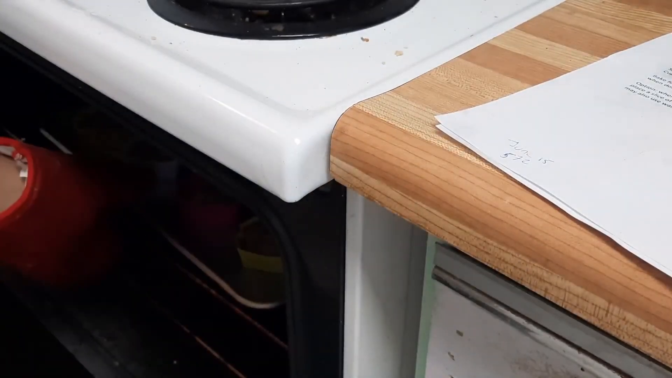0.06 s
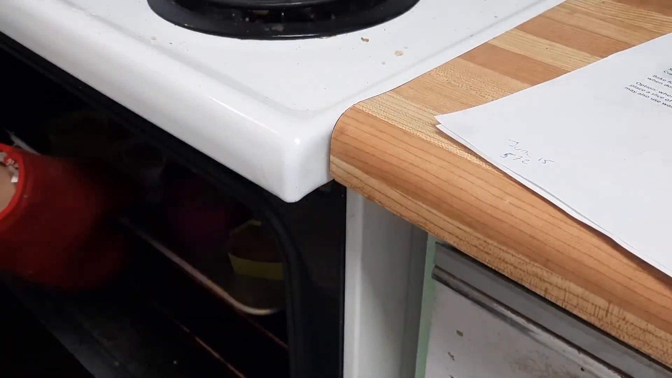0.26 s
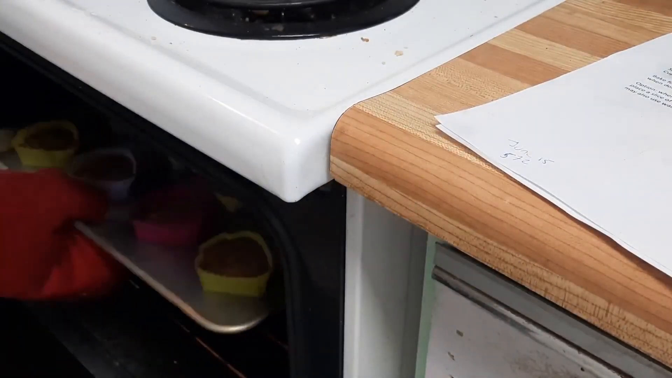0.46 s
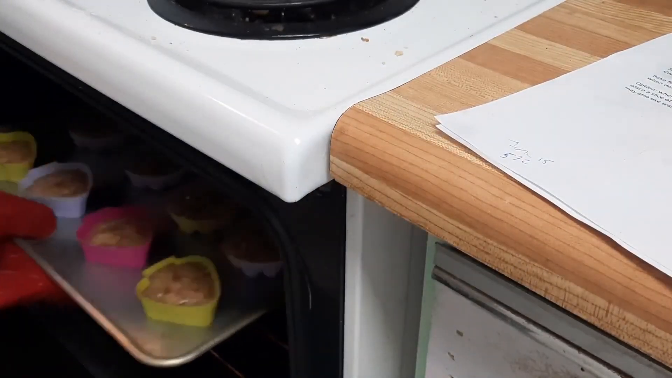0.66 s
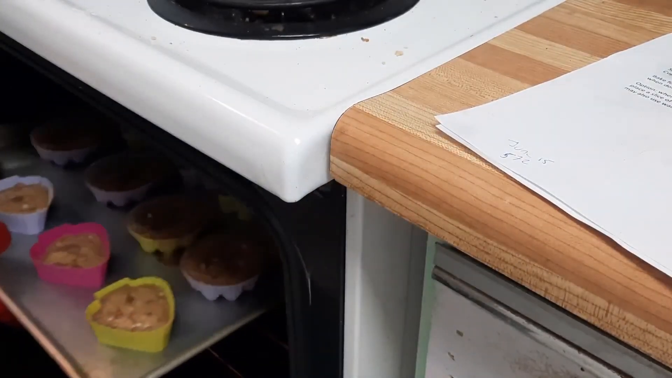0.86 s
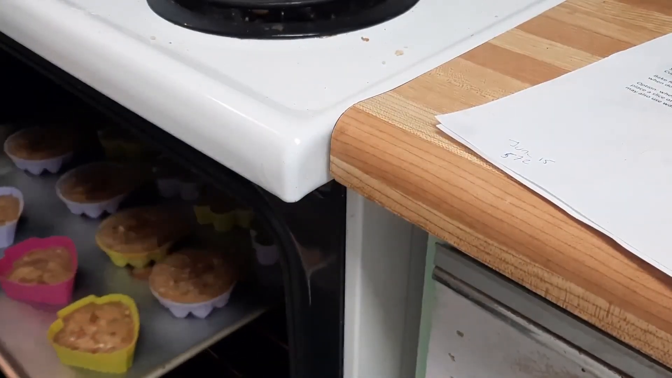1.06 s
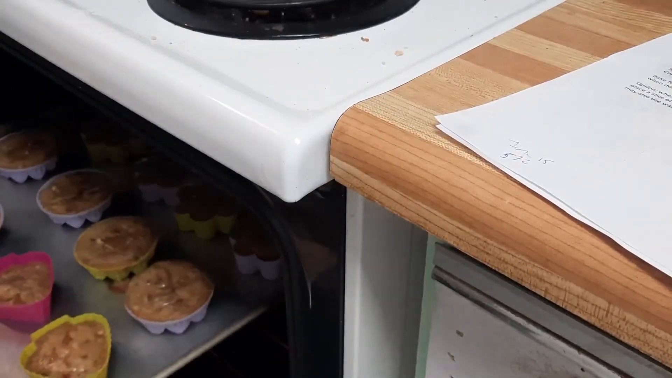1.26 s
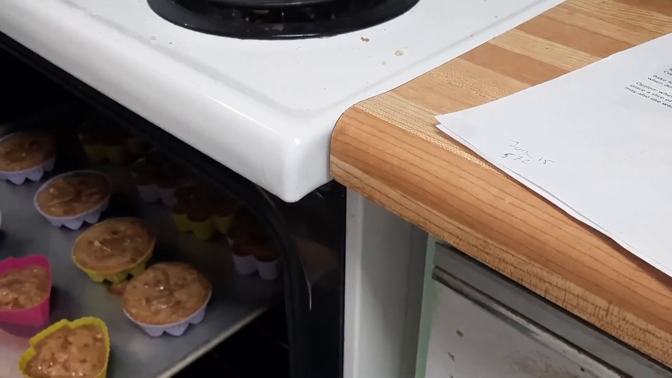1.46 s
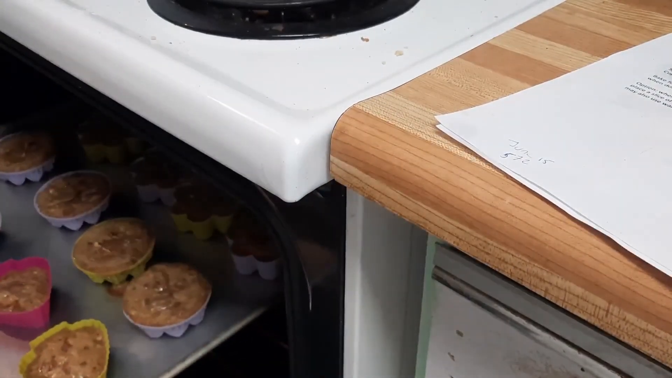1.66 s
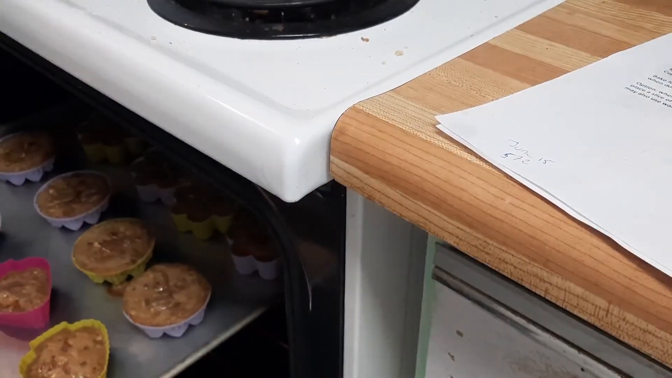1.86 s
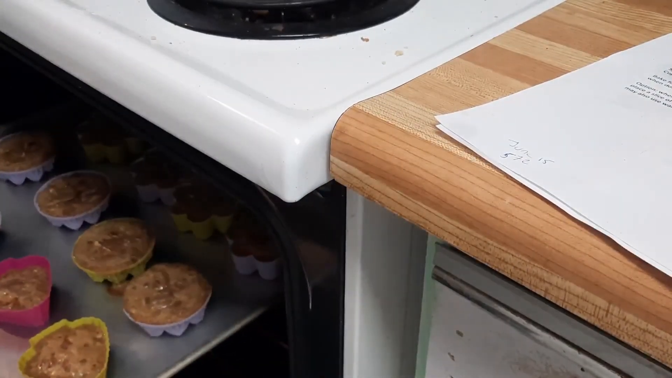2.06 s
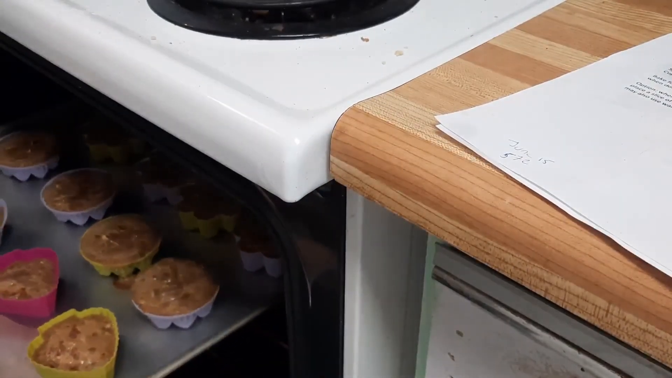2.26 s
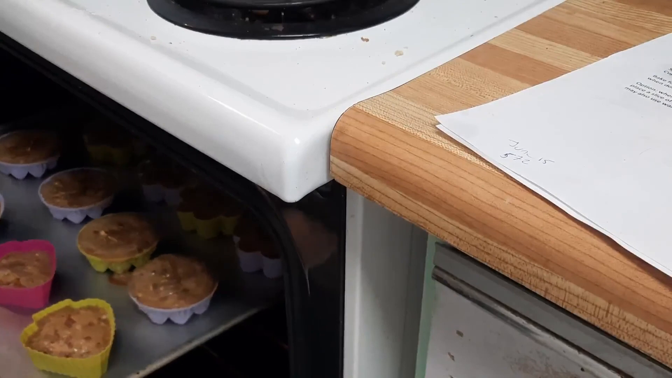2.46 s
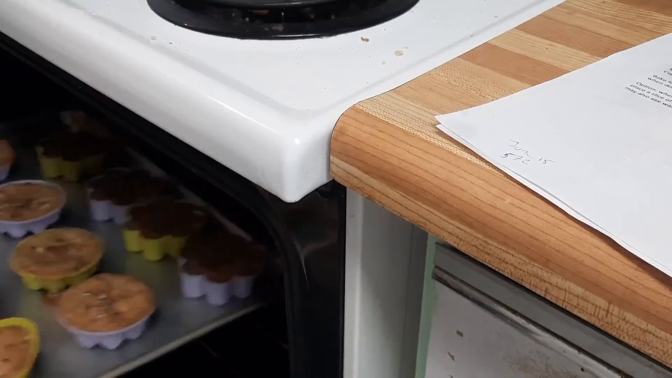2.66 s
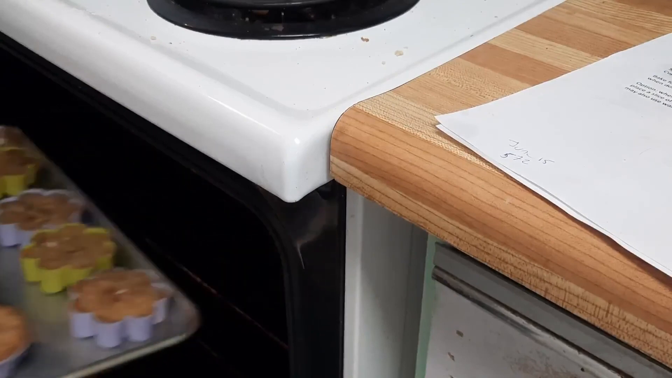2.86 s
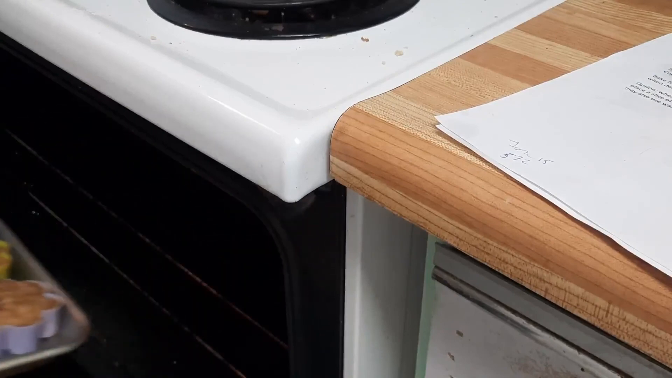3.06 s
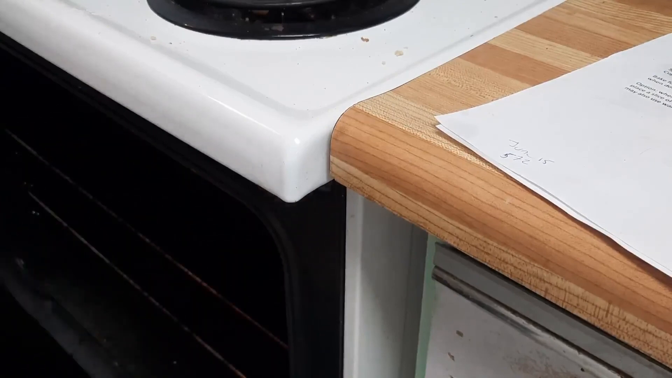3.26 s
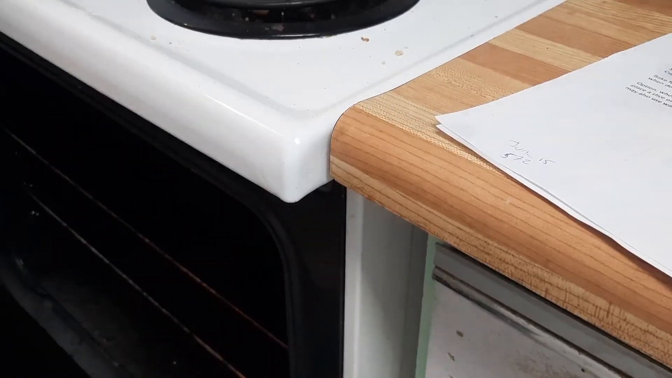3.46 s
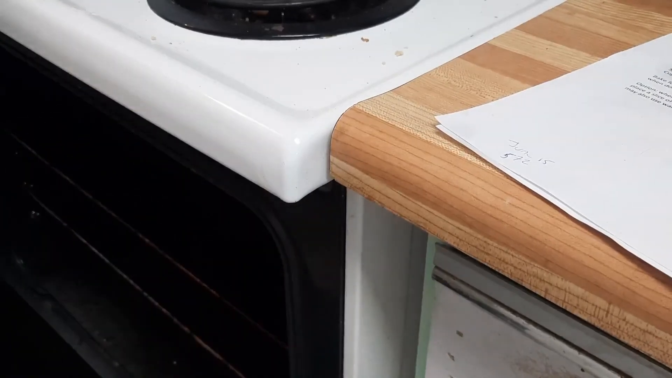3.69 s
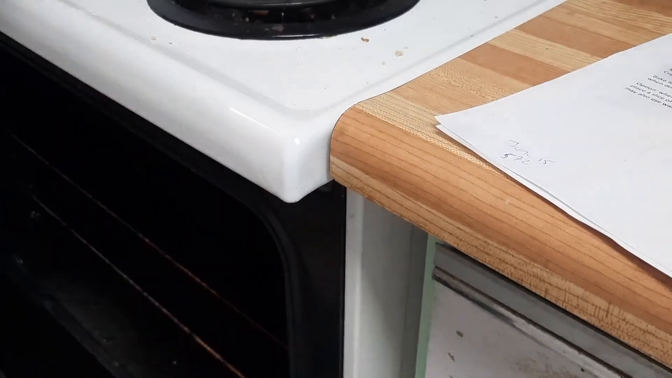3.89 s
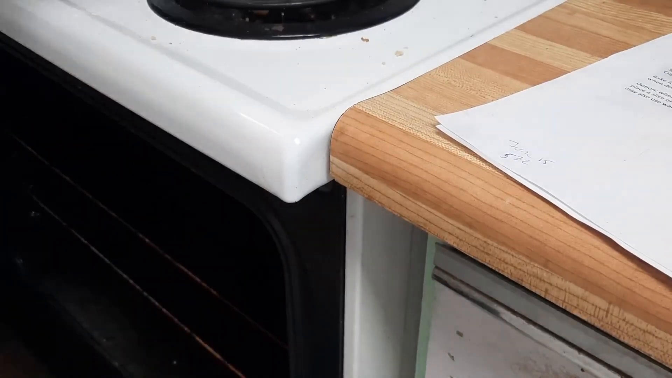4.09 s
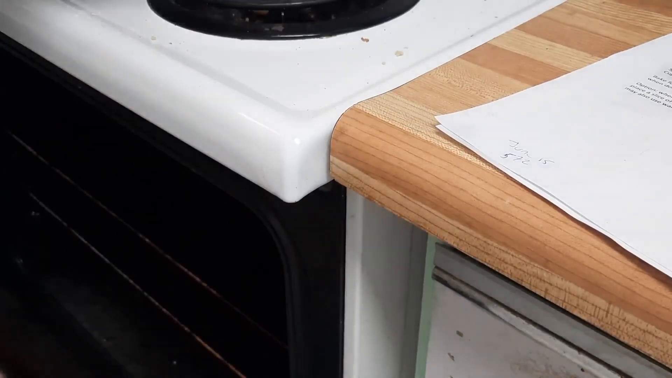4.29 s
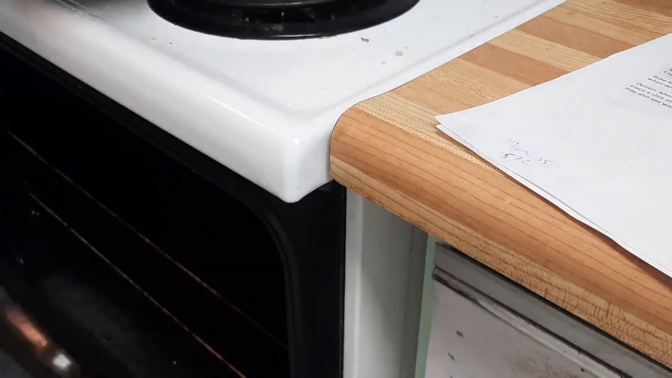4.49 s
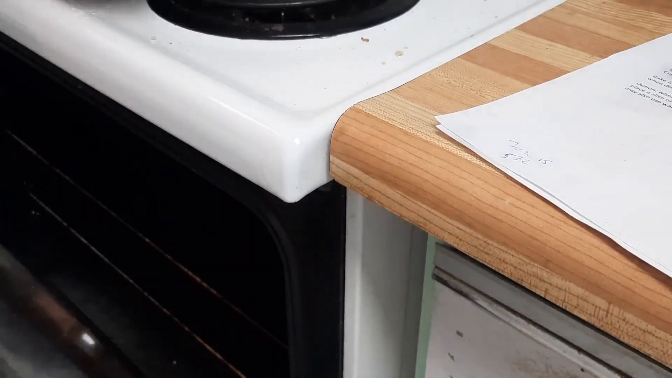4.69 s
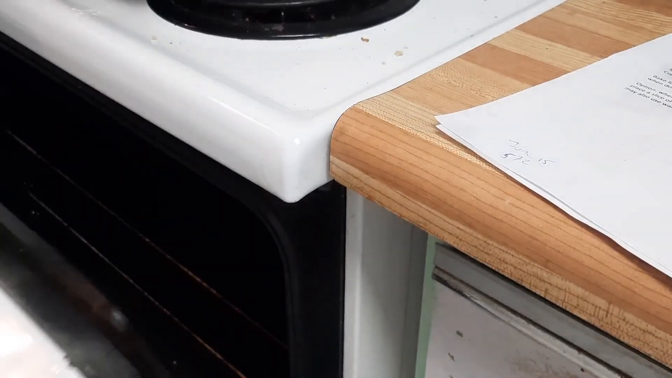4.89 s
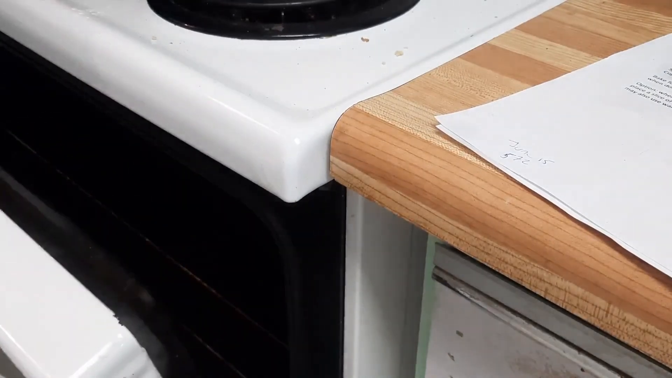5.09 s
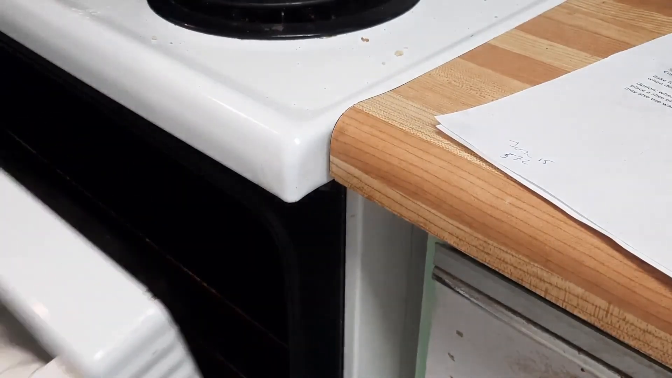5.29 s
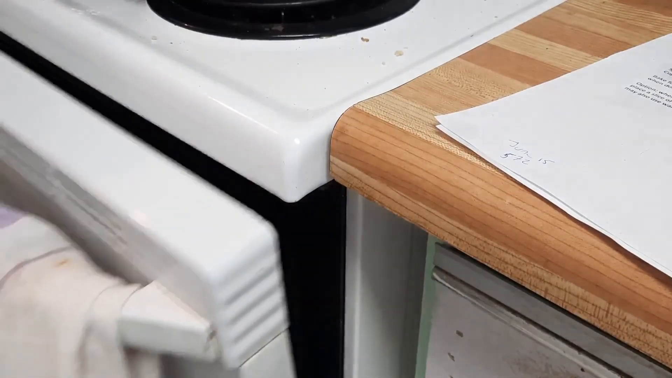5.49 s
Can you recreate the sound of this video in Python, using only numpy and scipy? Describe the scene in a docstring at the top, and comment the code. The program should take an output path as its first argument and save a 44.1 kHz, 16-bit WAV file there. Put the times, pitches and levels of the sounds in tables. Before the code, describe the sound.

In a small kitchen with a low pulsing fridge hum, a loaded steel rack gets several quick knocks and is dragged out with a fading ringing scrape. After a quiet pause the baking tray slides off with a short scrape and softer knocks. Faint cloth rustles follow, then hard, rattling clunks of rack and oven door. Close stereo microphone, a little louder on the left, with a short metallic echo.

```python
"""Rack and tray out of the oven

A wire rack with a baking tray is dragged out of an open oven; the tray rests, slides off and is set down.
Then rack and steel door clunk and rattle. A fridge hums in the small kitchen. Steel is shaped noise through
resonant modes, cloth is lumpy noise, the hum is two beating tones, and sparse decaying taps give the echo.
"""
import sys
import numpy as np
from scipy import signal
from scipy.fft import rfft, irfft, next_fast_len
from scipy.io import wavfile
from scipy.ndimage import uniform_filter1d

SR = 44100
rng = np.random.default_rng(int(sys.argv[2]) if len(sys.argv) > 2 else 0)


def persist_wave(psi):
    """Save psi, clipped to +-1, as 16-bit WAV."""
    counts = np.round(np.clip(psi, -1, 1) * 32767).astype(np.int16)
    wavfile.write(sys.argv[1], SR, np.atleast_2d(counts).T)


N = 244314
SIZE = next_fast_len(N)
TIME, HZ = np.arange(N) / SR, np.fft.rfftfreq(SIZE, 1 / SR)

# Room tone spectrum. Each row: frequency in Hz, relative level in dB.
AIR_COLOUR = [(30, -23), (54, -7.5), (81, -22), (120, -15), (160, -9.5), (300, -7.5), (438, -17),
              (521, -18.5), (900, -28.5), (1300, -40.5), (1700, -64)]
# Room resonances. Each row: centre in Hz, width of each of two passes in Hz, rms level in dB.
AIR_PEAKS = [(61, 19, -66), (200.9, 46, -58), (265, 87, -72), (305.2, 38, -55), (519.4, 31, -74),
             (681, 30, -74.5), (848, 15, -77.5)]
# Microphone hiss spectrum. Each row: frequency in Hz, relative level in dB.
HISS_COLOUR = [(530, -31), (900, -10), (1200, -21), (1780, -18.5), (2130, -20.5), (2620, -26), (5900, -27),
               (13800, -22.5), (16300, -30)]
AIR_DB, HISS_DB = -57, -74
# Left-right likeness. Each row: frequency in Hz, likeness from 0 to 1.
LIKENESS = [(60, 0.9), (250, 1), (500, 0.77), (900, 0.91), (1500, 0.056), (16000, 0.038)]
# Kitchen echo decay. Each row: frequency in Hz, t60 in seconds.
KITCHEN_DECAY = [(100, 0.25), (1000, 0.82), (5000, 0.2), (15000, 0.44)]
# Fabric friction spectrum. Each row: frequency in Hz, relative level in dB.
CLOTH_COLOUR = [(700, -34.5), (1300, 13.5), (2500, 1), (5000, -6.0), (9000, -5.0), (16000, -12.0)]
# Faint rustles of glove and sleeve. Each row: start in seconds, length in seconds, hiss in dB, scrape in dB.
RUSTLES = [(0, 0.076, -75, -60), (0.064, 0.13, -68, -66.5), (1.757, 0.12, -78.5, -81),
           (2.2, .19, -69.5, -77.5), (3.283, 0.19, -77, -90), (3.698, 0.22, -80, -74.5),
           (3.827, 0.25, -76, -75), (4.095, 0.17, -80.5, -78), (4.263, 0.16, -84, -76),
           (5.12, 0.11, -64, -67), (5.304, .24, -65, -63)]
# Faint rings, short tonal knocks and squeaks of wire and tray. Each row: start in seconds, pitch in Hz,
# level in dB before swell and decay, t60 in seconds.
FAINT_TONES = [(0.041, 812, -50.5, .38), (1.22, 873, -59, 2), (1.755, 8600, -70.5, 0.38),
               (2.3, 2470, -71, 0.46), (2.65, 390, -39.5, 0.3), (2.79, 645, -39, 0.36),
               (2.98, 798, -41.5, 0.38), (3.1, 1690, -61, 1.1), (3.25, 860, -61, 1.0),
               (3.1, 2760, -60, 0.9)]
# Decay of struck sheet steel. Each row: frequency in Hz, t60 in seconds at ring factor 1.
STEEL_DECAY = [(80, 0.81), (260, 0.45), (700, 0.16), (1840, 0.23), (4850, 0.23), (12800, 0.15)]
# Centres in Hz of the bands in which a blow decays.
BLOW_BANDS_HZ = [70, 150, 300, 600, 1200, 2400, 4800, 9000, 14000]
# Rack and door clunks. Each row: start in seconds, level in dB before the modes, bass in dB,
# brightness in dB, ring factor.
CLUNKS = [(4.631, -23.5, 0.5, 5, 1.02), (4.641, -32, 8, -22, 1.35), (4.803, -13.5, .5, 4.5, 0.82),
          (4.824, -28.5, -10, 11, 1.05), (4.867, -23.5, 2, 2, 1.16), (4.949, -45, 8, 1, 2.4),
          (4.985, -44.5, 21, -10, 0.65), (5.007, -26.5, 6, -7, 1.12), (5.052, -33.5, 11.5, 3, 0.74),
          (5.089, -39.5, 14.5, -3, 0.6), (5.225, -45.5, 11, -24, 1.5), (5.236, -42, 8, -4.5, 1.25),
          (5.43, -59, 26, -30, 1.8)]
# Clunk spectrum. Each row: frequency in Hz, relative level in dB.
DOOR_COLOUR = [(24, -17), (40, -12), (216, -11), (323, -3), (471, -3.5), (605, -3), (1220, -2), (2080, -1),
               (13000, -12.5), (15200, -14), (16300, -46)]
# Modes of door and oven box. Each row: frequency in Hz, gain in dB, approximate t60 in seconds.
DOOR_MODES = [(319, -2, 0.14), (397, -3, 0.13), (630, 0, 0.024), (689, 3.5, 0.11), (823, 0.5, 0.05),
              (927, 5, 0.045), (1057, 4.5, 0.047), (1490, 8, 0.13), (1600, 4, 0.044), (1886, -1, 0.088),
              (2180, 1.5, 0.062), (2430, -14, 0.12), (2530, -9, 0.11), (2880, 3, 0.062), (3210, -10, 0.066),
              (3360, -14.5, 0.067), (3960, -3.5, 0.047), (4530, 0.5, 0.052), (5020, 2, 0.074),
              (5610, -1.5, .04)]
# Tray and rack knocks. Each row: start in seconds, level in dB before the modes, bass in dB,
# brightness in dB, ring factor.
KNOCKS = [(0.046, -48, 3, -18, 0.63), (0.205, -27.5, -3.5, -27, 1.8), (0.213, -24, -2.5, -1, 1.7),
          (0.239, -31.5, -8, 9, .6), (0.281, -14, -9.5, 3.5, 0.56), (0.309, -24, -3, -4, 1.18),
          (0.346, -24.5, -5, 0, 0.98), (0.434, -37.5, 6.5, 4, 1.66), (0.559, -35, 4.5, -11, 0.99),
          (0.649, -40, 4, -5, 0.47), (1.2, -50.5, 8, -10, 1.2), (2.572, -65, -3, -13, 0.55),
          (2.645, -43, -18, 13, 1.3), (2.791, -43, 6, -25, 5.2), (2.859, -40.5, -3, 5.5, 1.1),
          (2.981, -39, -6, -9, 1.8), (3.021, -38.5, -1, -11, 2.36), (3.045, -48.5, -3.5, 3.5, 2.8),
          (3.067, -36, -8, -12, 0.75), (3.119, -50, 5.5, -6, 1.7)]
# Knock spectrum. Each row: frequency in Hz, relative level in dB.
TRAY_COLOUR = [(24, -48), (40, -20.5), (127, -4), (216, -9.5), (331, -1.5), (471, -7), (883, -2),
               (1350, -7.5), (6280, -21.5), (15200, -30.5), (16300, -41)]
# Strokes of steel on steel: rack creeps, is pulled out, then tray is drawn off.
# Each row of a stroke: time in seconds, sliding level in dB before offsets and modes.
STROKES = [
    [(.13, -72), (.2, -49)],
    [(.4, -53), (.5, -41.5), (.66, -40.5), (.84, -43.5), (1.03, -51), (1.25, -54.5), (1.37, -62.5),
     (1.44, -76)],
    [(2.45, -78), (2.52, -63.5), (2.58, -48.5), (2.67, -43), (2.73, -40), (2.86, -44.5), (2.92, -69),
     (2.97, -59.5)],
]
# Sliding spectrum. Each row: frequency in Hz, relative level in dB.
RUB_COLOUR = [(26, -38.5), (45, -17.5), (112, -2.5), (253, -7), (316, 6.5), (480, -8), (662, -9.5),
              (1420, -15.5), (3130, -22.5), (13100, -31), (16300, -34.5)]
# Centres in Hz of rumble, scrape and hiss.
RUB_BANDS_HZ = [500, 1900, 7000]
# Hiss, scrape, rumble in turn. Each row: offset in dB at full slide, share of each change in level.
RUB_FOLLOW = [(-0.5, 1), (-7, 0.96), (-7, .7)]
# Modes of the loaded rack. Each row: frequency in Hz, gain in dB, approximate t60 in seconds.
RACK_MODES = [(138.7, 5, 1), (315.5, 3, 0.089), (403.5, 6.5, 0.16), (577.5, 4.5, 0.2), (691, 0, 0.053),
              (797.5, 7.5, 0.15), (889, 9.5, 0.94), (1145, -2, 0.1), (1570, 0, 0.073), (1740, 1, 0.27),
              (2056, 0.5, 0.072), (3130, 5, 0.61), (3720, -12.5, .1), (4340, 2.5, 0.2)]
# Modes of the tray alone. Each row: frequency in Hz, gain in dB, approximate t60 in seconds.
TRAY_MODES = [(326, -14.5, 0.65), (407, 17.5, 0.88), (648, 11.5, 0.24), (823, 10.5, 0.63), (830, 6, 0.24),
              (1085, 6.5, 0.31), (1182, 1, 0.41), (1760, 2, 0.15), (2480, 1.5, 0.044), (3016, 7.5, 0.093),
              (3440, 7.5, 0.15), (3900, -13.5, 0.17)]

HUM_CENTRE_HZ, HUM_DB = 119.2, -53.5
HUM_OFFSET_HZ, HUM_TOP_S, ROTOR_GAIN = .845, 2.37, .85  # tones lie one offset above and below centre
RUSTLE_RISE_S, RUSTLE_FADE_S = 0.018, 0.035
FUZZ_S, SWELL_SHARE = 0.043, 0.018  # width as a share of pitch / t60; swell as a share of t60
CLUNK_CRACK_DB, CLUNK_TREBLE_RISE_S = -15.5, 0.0067
KNOCK_CRACK_DB, KNOCK_TREBLE_RISE_S = -7, 0.0041
CRACK_PER_BRIGHT = .55  # a bright, hard contact cracks more
RUB_FULL_DB = -42
TRAY_LIFTED_S = 2.1
LEFT_OVER_RIGHT_DB, LEFT_EARLY_S = 2.5, 0.00027
LOW_CUT_HZ, EDGE_HZ = 51.4, 16300


def gain_of(db):
    """Decibels to amplitude."""
    return 10 ** (np.asarray(db) / 20)


def evened(x):
    """Scales a channel pair to rms 1."""
    return x / np.sqrt(np.mean(x ** 2, axis=(-2, -1), keepdims=True) + 1e-20)


def read(points, hz):
    """Reads a (Hz, value) table on a log-frequency axis."""
    f, value = np.transpose(points)
    return np.interp(np.log(hz + 1), np.log(f + 1), value)


def wave(spectrum):
    """Back from spectrum to samples."""
    return irfft(spectrum, SIZE)[..., :N]


def resonate(x, hz, width_hz):
    """A two-pole resonance of gain 1 at its centre."""
    b, a = signal.iirpeak(hz, hz / max(width_hz, .5), SR)
    return signal.lfilter(b, a, x)


def bands(spectrum, centres_hz):
    """Splits into overlapping bands that add up to the whole."""
    weights = np.eye(len(centres_hz))
    return np.array([wave(spectrum * read(list(zip(centres_hz, own)), HZ)) for own in weights])


def alike(a, b, hz):
    """Two channels from two unrelated spectra: a close pair of microphones agrees in the bass."""
    same = np.clip(read(LIKENESS, hz), -1, 1)
    return np.array([a, same * a + np.sqrt(1 - same ** 2) * b])


def noise(colour, grain_db=0., grain_samples=40, patchy_db=0.):
    """Spectrum of two-channel coloured noise, lumpy in level by short grains and patchy in colour."""
    a, b, lumps = rng.standard_normal((3, SIZE))
    lumps = uniform_filter1d(lumps, max(round(grain_samples), 1))
    x = np.array([a, b]) * gain_of(grain_db * lumps / lumps.std())
    if patchy_db:
        hz, _, z = signal.stft(x, SR, nperseg=512)
        patches = uniform_filter1d(rng.standard_normal(z.shape[1:]), size=3, axis=0)
        patches = uniform_filter1d(patches, size=6, axis=1)
        above_bass = np.clip(hz / 1500, 0, 1)[:, None]
        x = signal.istft(z * gain_of(patchy_db * evened(patches) * above_bass), nperseg=512)[1]
    return alike(*rfft(x, SIZE), HZ) * gain_of(read(colour, HZ))


def air(white):
    """Room tone that pools in a few low resonances, over the hiss of the microphones."""
    room = evened(wave(noise(AIR_COLOUR))) * gain_of(AIR_DB)
    hiss = evened(wave(noise(HISS_COLOUR))) * gain_of(HISS_DB)
    peaks = sum(gain_of(db) * evened(resonate(resonate(white, hz, width_hz), hz, width_hz))
                for hz, width_hz, db in AIR_PEAKS)
    return room + hiss + peaks


def fridge():
    """Mains hum and the slightly slower rotor beat against each other."""
    t = TIME - HUM_TOP_S
    mains = np.exp(2j * np.pi * HUM_OFFSET_HZ * t)
    rotor = ROTOR_GAIN * np.exp(-2j * np.pi * HUM_OFFSET_HZ * t)
    carrier = np.exp(2j * np.pi * (HUM_CENTRE_HZ * t + rng.random()))
    steps_s = np.arange(0, TIME[-1] + .2, .11)
    waver_db = np.interp(TIME, steps_s, 1.5 * rng.standard_normal(len(steps_s)))  # the load is uneven
    return gain_of(HUM_DB + waver_db) * ((mains + rotor) * carrier).real


def kitchen(x):
    """Echo of sparse taps of random sign, each band dying at its own speed."""
    taps = np.zeros((2, SR))
    at = np.arange(300, SR - 20, 20) + rng.integers(0, 20, (2, (SR - 301) // 20))  # one per 20 samples
    np.put_along_axis(taps, at, rng.choice([-1., 1.], at.shape), 1)
    taps = irfft(alike(*rfft(taps), np.fft.rfftfreq(SR, 1 / SR)), SR)
    hz, t, z = signal.stft(taps, SR, nperseg=256)
    decay_db = -60 * t / read(KITCHEN_DECAY, hz)[:, None]
    tail = signal.istft(z * gain_of(decay_db), SR, nperseg=256)[1]
    return signal.fftconvolve(x, tail / np.linalg.norm(tail[0]), axes=1)[:, :N]


def cloth():
    """Soft lumpy friction of fabric: each rustle rises, holds and fades."""
    scrape, hiss = evened(bands(noise(CLOTH_COLOUR, 1.2, 300), RUB_BANDS_HZ[1:]))
    power = np.zeros((2, N))
    for start_s, length_s, hiss_db, scrape_db in RUSTLES:
        rise = np.clip((TIME - start_s) / RUSTLE_RISE_S, 0, 1)
        fade = np.exp(-np.maximum(TIME - start_s - length_s, 0) / RUSTLE_FADE_S)
        power += (gain_of([[hiss_db], [scrape_db]]) * rise * fade) ** 2
    return hiss * np.sqrt(power[0]) + scrape * np.sqrt(power[1])


def faint_tones(white):
    """Narrow, slightly fuzzy tones that swell and die; at a given pitch, the slower the decay, the purer."""
    out = np.zeros((2, N))
    for start_s, hz, db, t60_s in FAINT_TONES:
        t = np.maximum(TIME - start_s, 0)
        width_hz = FUZZ_S * hz / t60_s
        tone = evened(resonate(resonate(white, hz, width_hz), hz, width_hz))
        swell = 1 - np.exp(-t / (SWELL_SHARE * t60_s))
        out += tone * swell * gain_of(db - 60 * t / t60_s)
    return out


def blows(rows, crack_db, treble_rise_s, colour, grain_db, patchy_db):
    """Each blow cracks, swells as loose parts chatter, then dies band by band at the speed of sheet steel."""
    spectrum = noise(colour, grain_db, patchy_db=patchy_db)
    middle = wave(spectrum * (HZ > 600) * (HZ < 3000))
    parts = bands(spectrum / middle.std(), BLOW_BANDS_HZ)
    hz = np.array(BLOW_BANDS_HZ)[:, None]
    power = np.zeros((len(BLOW_BANDS_HZ), N))
    rise_s = max(treble_rise_s, 3e-4) * (1 + 200 / hz)  # bass builds up later
    for start_s, db, bass_db, bright_db, ring_factor in rows:
        at = round(start_s * SR)
        t = TIME[:N - at][:SR * 2 // 3]
        tilt_db = read([(250, bass_db), (1200, 0), (3500, bright_db / 5), (9000, bright_db)], hz)
        decay_db = -60 * t / (ring_factor * read(STEEL_DECAY, hz))
        body = (1 - np.exp(-t / rise_s)) * gain_of(tilt_db + decay_db)
        # first contact: short and bright
        crack_tilt = (hz > 2000) * np.minimum(hz / 3000, 1.7)
        crack = crack_tilt * gain_of(crack_db + CRACK_PER_BRIGHT * bright_db - 60 * t / 0.021)
        power[:, at:at + len(t)] += gain_of(2 * db) * (body ** 2 + crack ** 2)
    return (parts * np.sqrt(power)[:, None]).sum(axis=0)


def ring(drive, modes, wander_db):
    """The drive is heard directly and through each mode; the contact point moves, so the modes take turns."""
    steps_s = np.arange(0, TIME[-1] + .1, .07)
    wander = gain_of(wander_db * rng.standard_normal((len(modes), len(steps_s))))
    out = drive
    for (hz, db, t60_s), share in zip(modes, wander):
        fed = drive * np.interp(TIME, steps_s, share)
        out = out + gain_of(db) * resonate(fed, hz, 2.07 / t60_s)
    return out


def door():
    """Clunks ring the panels of door and oven box."""
    drive = blows(CLUNKS, CLUNK_CRACK_DB, CLUNK_TREBLE_RISE_S, DOOR_COLOUR, 1.1, 2.5)
    return ring(drive, DOOR_MODES, 3.1)


def slide():
    """Hiss, scrape and rumble follow one level by different shares; contact fades in and out at each stroke."""
    parts = evened(bands(noise(RUB_COLOUR, 0.72, 90, 1.6), RUB_BANDS_HZ))
    out = np.zeros((2, N))
    for rows in STROKES:
        s, db = np.transpose(rows)
        off_db = -400 * np.maximum(np.maximum(s[0] - TIME, TIME - s[-1]), 0)  # 400 dB a second
        change_db = np.interp(TIME, s, db) - RUB_FULL_DB
        for part, (offset_db, share) in zip(parts[::-1], RUB_FOLLOW):
            out += part * gain_of(RUB_FULL_DB + offset_db + share * change_db + off_db)
    return out


def tray():
    """Knocks and sliding ring the loaded rack at first, later the tray alone."""
    drive = blows(KNOCKS, KNOCK_CRACK_DB, KNOCK_TREBLE_RISE_S, TRAY_COLOUR, 1.5, 2.0) + slide()
    loaded_rack = ring(drive * (TIME < TRAY_LIFTED_S), RACK_MODES, 1.5)
    tray_alone = ring(drive * (TIME >= TRAY_LIFTED_S), TRAY_MODES, 2.5)
    return loaded_rack + tray_alone


def scene():
    """Steel and its echo over cloth, room tone and hum; all but the direct clunks reach the left first."""
    white = wave(noise([(20, 0), (20000, 0)]))
    rack, clunks = tray(), door()
    echo = gain_of(-13.0) * kitchen(rack + clunks)
    aside = rack + echo + cloth() + faint_tones(white) + air(white) + fridge()
    aside[1] = np.roll(aside[1], round(LEFT_EARLY_S * SR))
    return aside + clunks


def record(dry):
    """The left microphone is a little louder; then a low cut and the band limit."""
    pair = dry * gain_of(np.array([[.5], [-.5]]) * LEFT_OVER_RIGHT_DB)
    pair = signal.sosfilt(signal.butter(6, LOW_CUT_HZ, "high", fs=SR, output="sos"), pair)
    band_limit = signal.firwin(511, EDGE_HZ, window=("kaiser", 9), fs=SR)
    return signal.oaconvolve(pair, band_limit[None], "same")


dry = scene()
out = record(dry)
persist_wave(out)
```